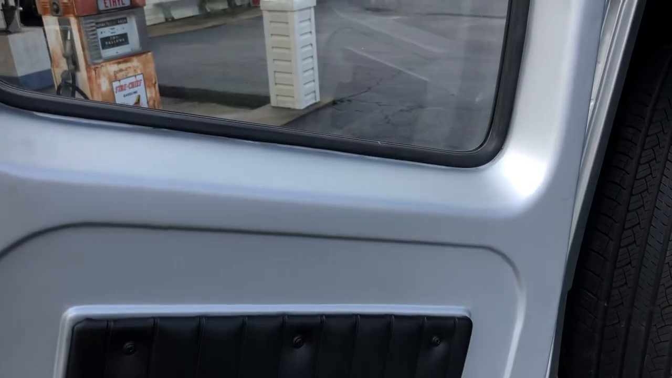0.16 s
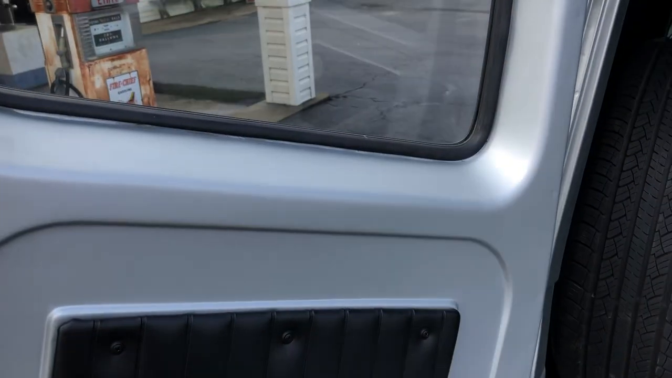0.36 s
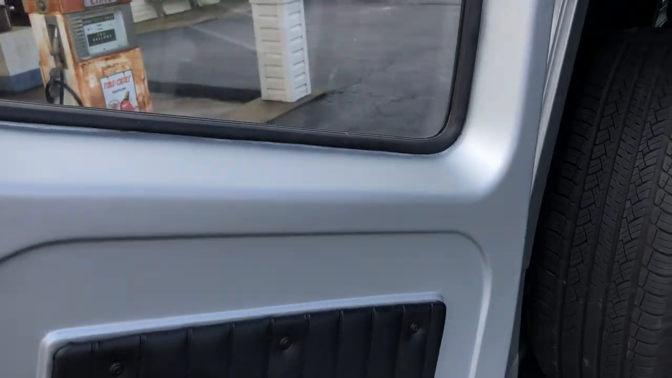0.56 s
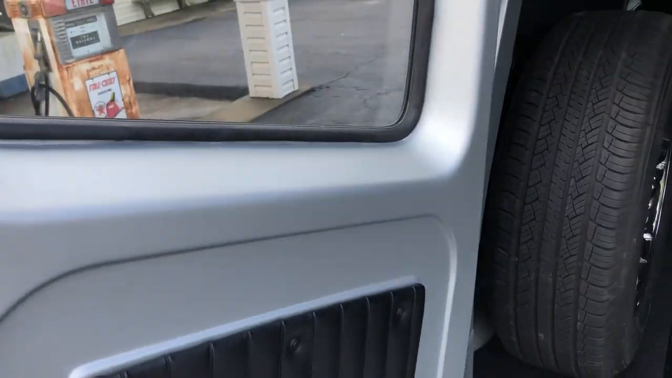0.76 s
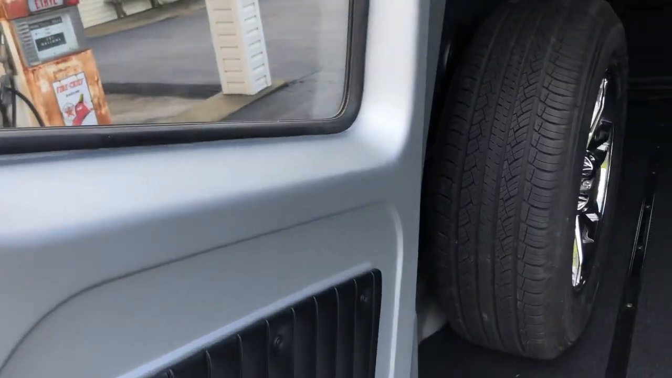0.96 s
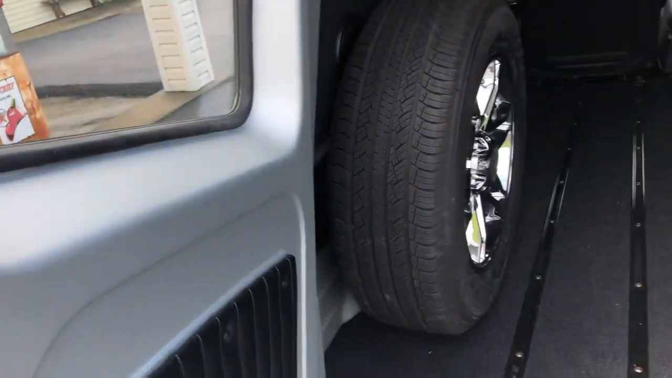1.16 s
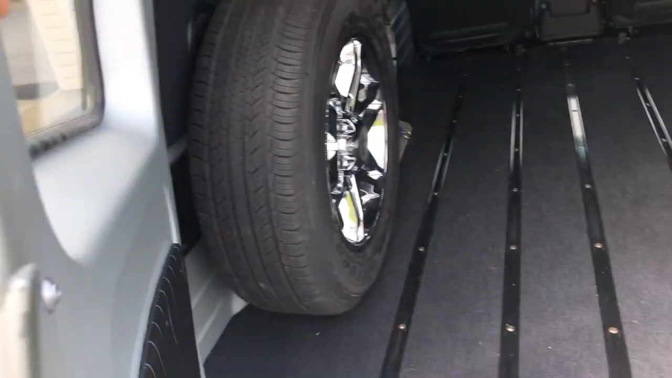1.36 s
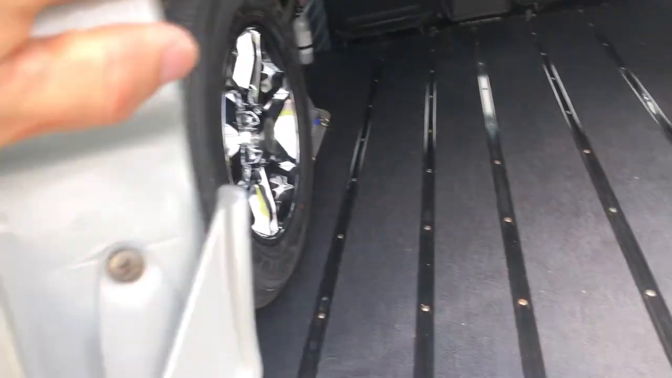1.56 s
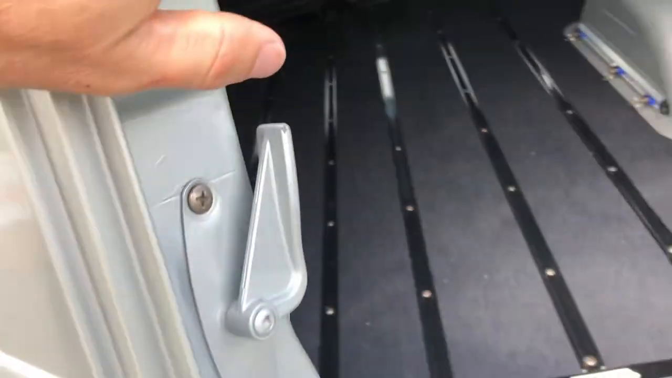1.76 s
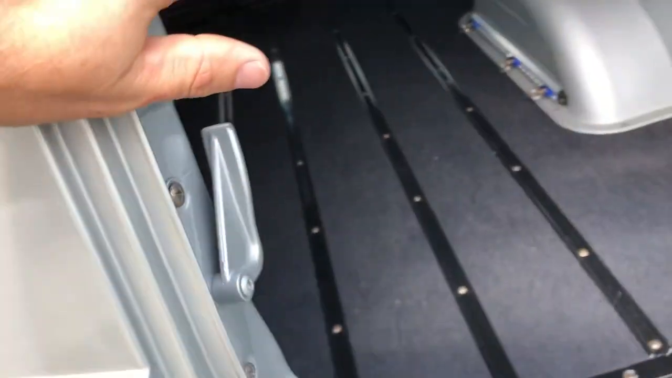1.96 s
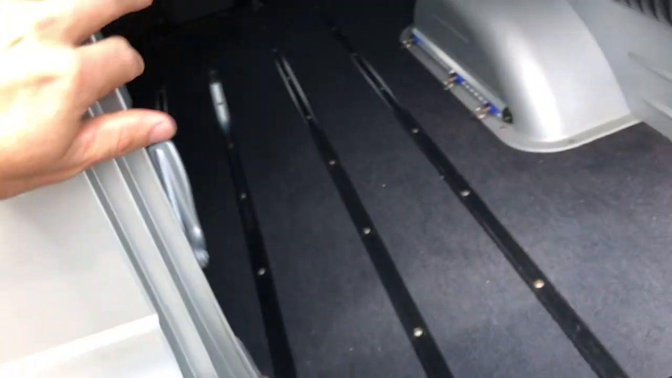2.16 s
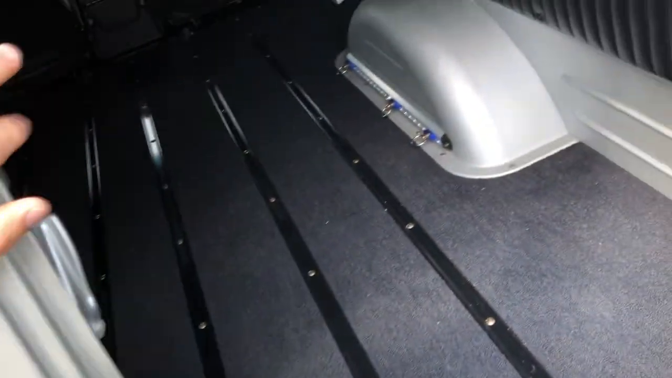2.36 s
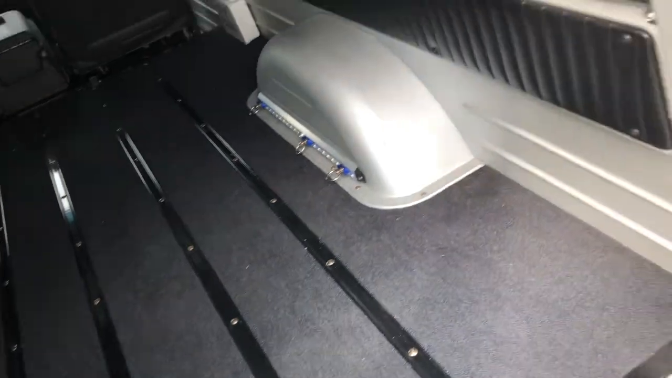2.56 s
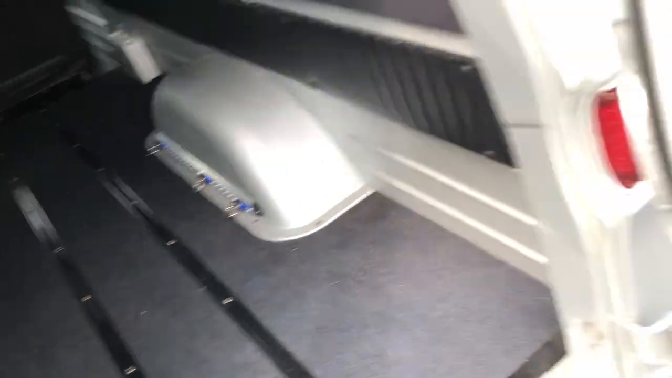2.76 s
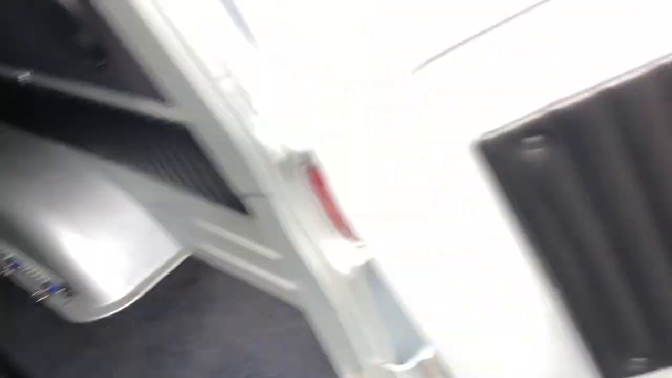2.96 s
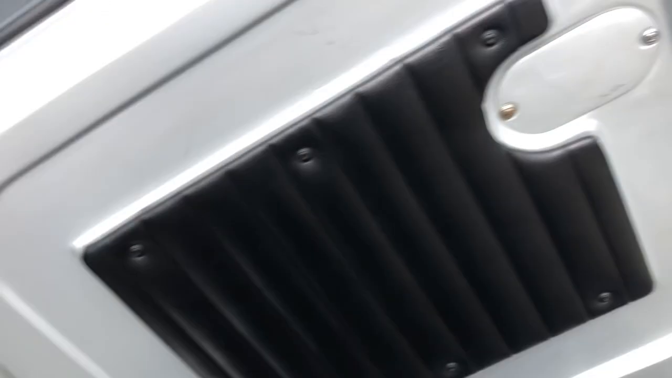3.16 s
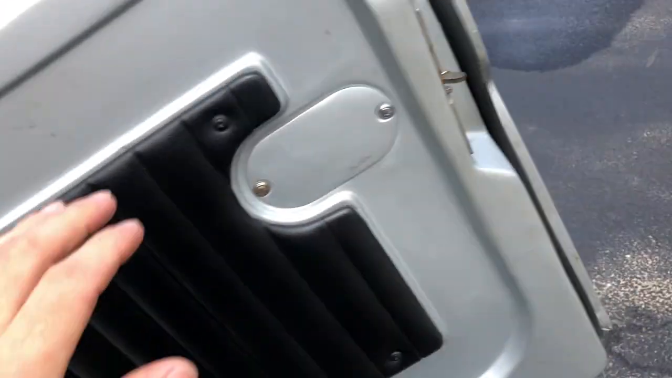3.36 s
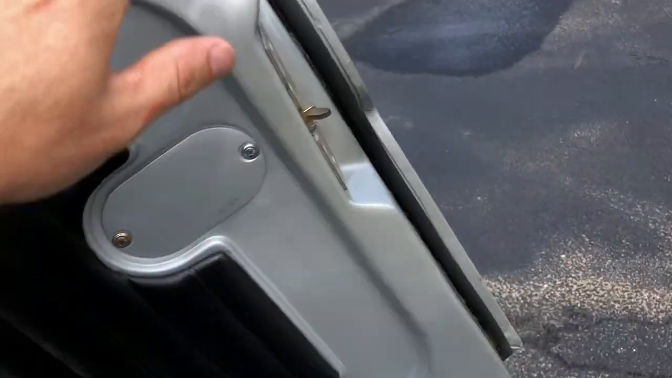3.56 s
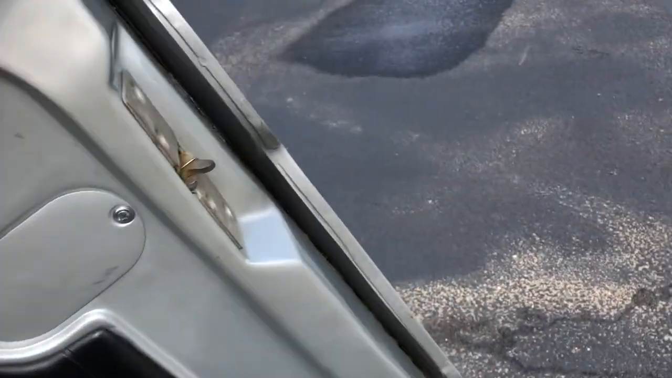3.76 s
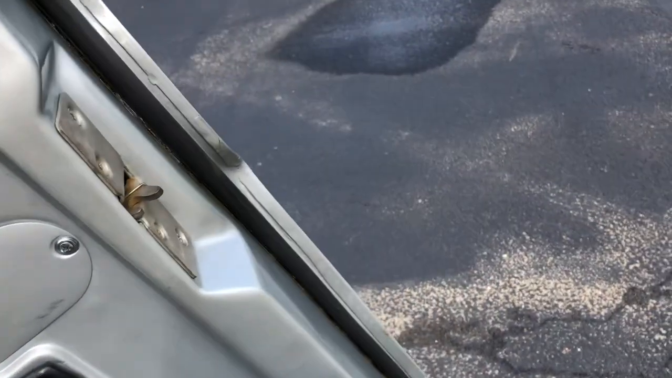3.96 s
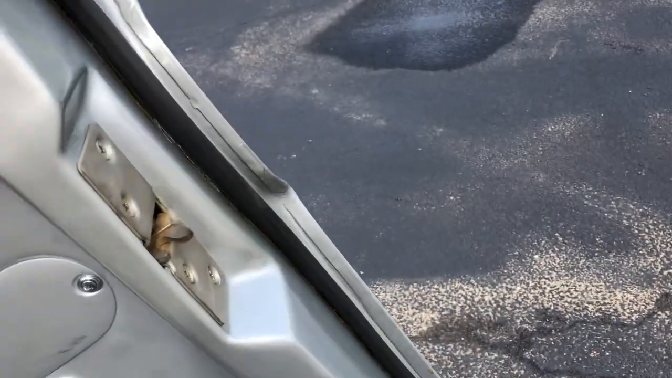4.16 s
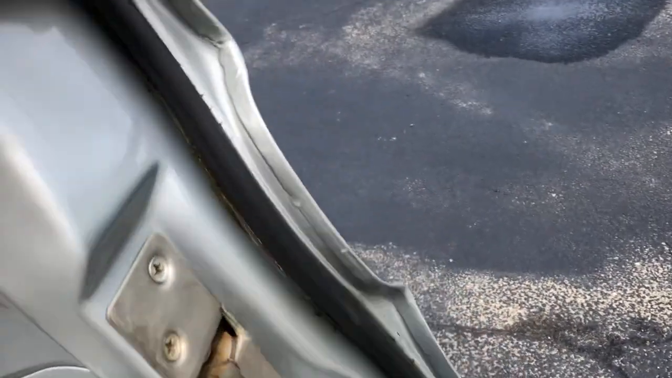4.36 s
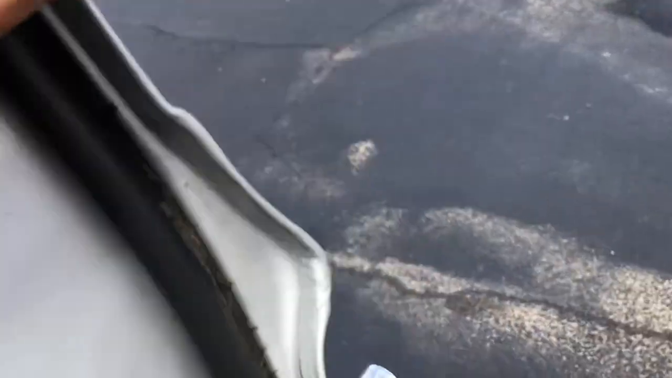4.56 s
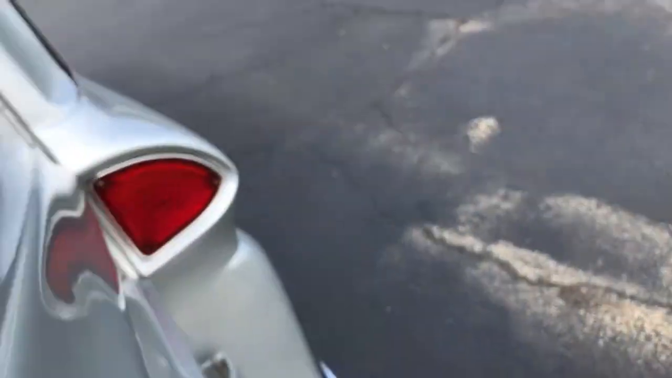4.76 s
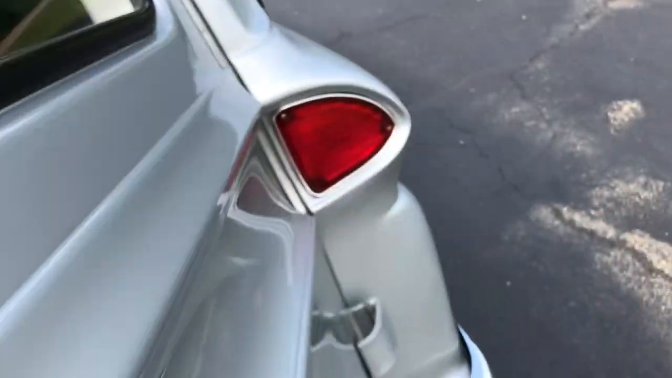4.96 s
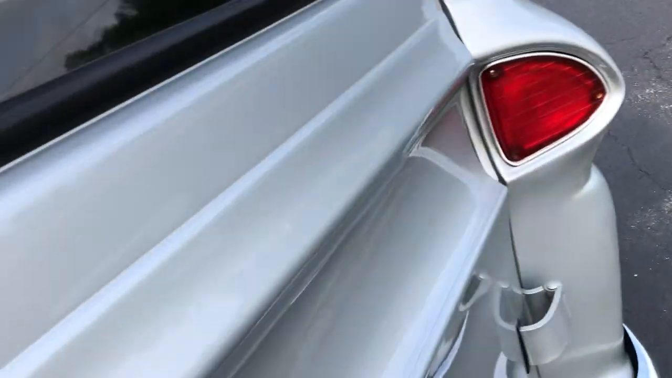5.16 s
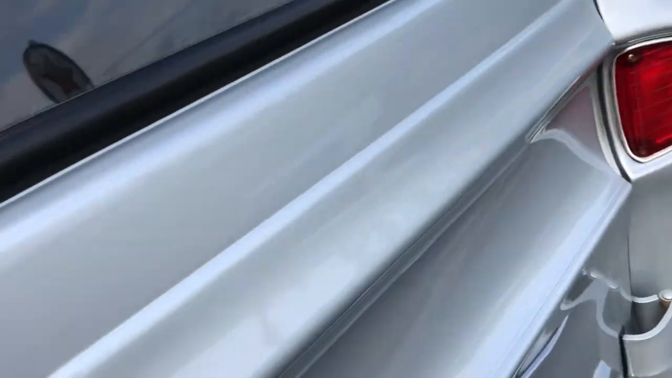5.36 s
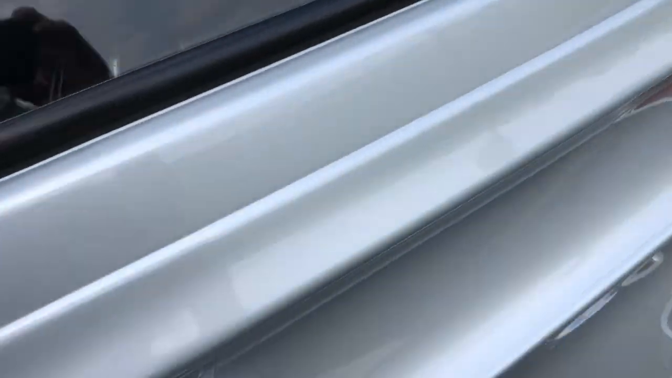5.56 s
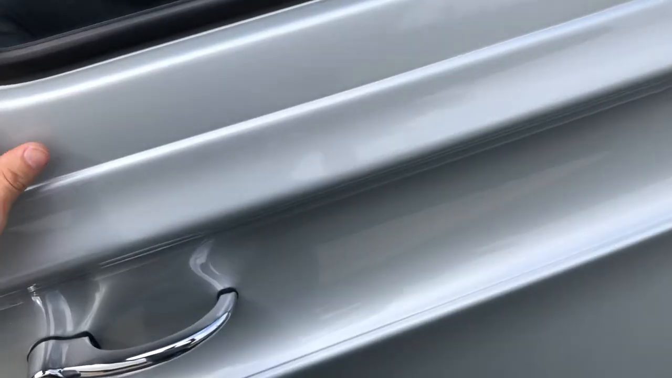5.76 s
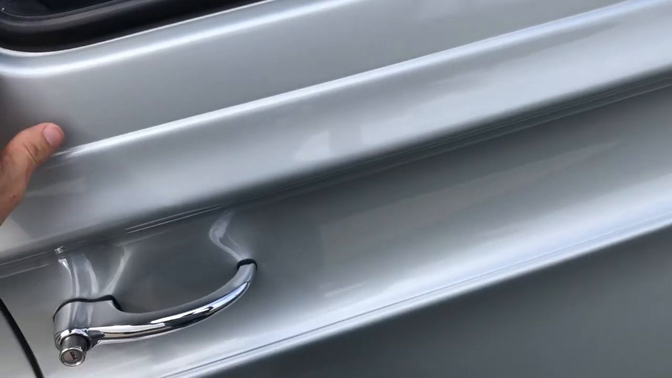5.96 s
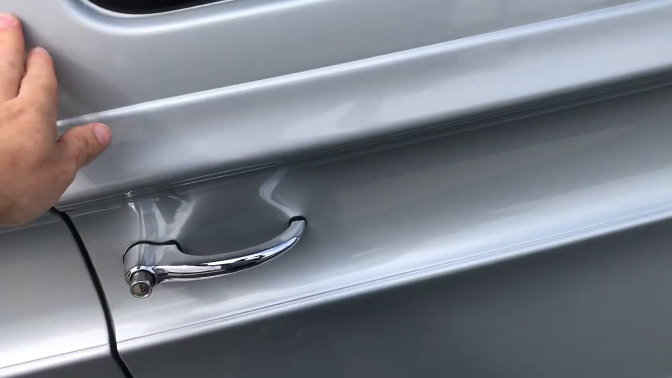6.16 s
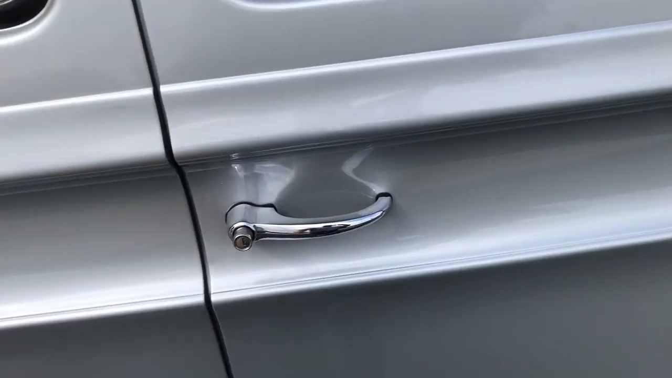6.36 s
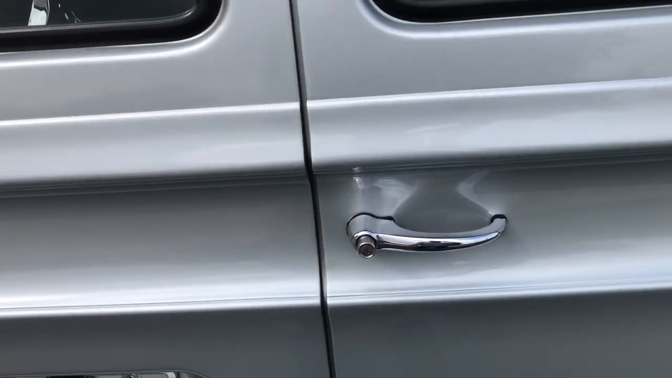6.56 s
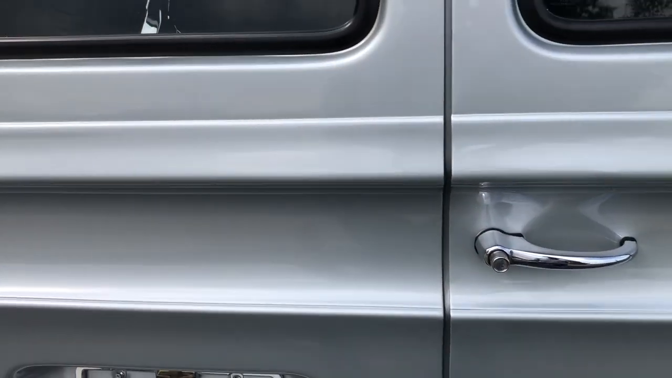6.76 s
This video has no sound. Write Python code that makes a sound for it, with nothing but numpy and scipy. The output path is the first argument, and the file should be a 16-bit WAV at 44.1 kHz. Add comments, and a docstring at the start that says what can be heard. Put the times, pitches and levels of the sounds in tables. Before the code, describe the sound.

Outdoors, close to an old steel van, with faint low traffic rumble and light rustle. From 0.3 to 0.7 s, crisp latch clicks mix with dull door knocks; another small group comes around 1.0 s, and a dry hinge rubs faintly upward in pitch at 1.3-1.55 s. A click at 2.05 s precedes the first slam at 2.2 s: a dense burst of steel blows lasting about 0.2 s, with a deep swelling boom and hollow bay tail. A loose part rattles from 2.5 to 2.9 s. Soft low bumps cluster at 2.95-3.4 s, then faint scuffs, knocks and clicks continue through 5.2 s. A firmer knock and click at 5.6 s lead into the second slam at 5.72 s, sharp, metallic and quickly dulling, with a low ringing boom. Loose taps fade from 5.9 to 6.3 s, leaving one soft knock at 6.5 s and quiet rumble until about 7 s.

```python
"""Van doors slammed on a forecourt

The two steel rear doors of an old van are slammed close by: runs of blows ring dense modes of latch and
sheet steel, and swelling low sines boom with the cargo bay. A loose part then taps for about 0.4 s.
Latch clicks, dull knocks, soft bumps, a dragging hinge, scuffs and tiny ticks are the handling of the
doors, over shaped noise for distant traffic and rustle."""
import sys
import numpy as np
from scipy import signal
from scipy.fft import rfft, irfft
from scipy.io import wavfile

SR = 44100
rng = np.random.default_rng(int(sys.argv[2]) if len(sys.argv) > 2 else 0)


def int16_out(signal):
    """Quantize to a 16-bit WAV file."""
    q = np.round(np.clip(np.atleast_2d(signal).T, -1, 1) * 32767)
    wavfile.write(sys.argv[1], SR, q.astype(np.int16))


N = 304110  # samples
BANDS = np.geomspace(30, 16000, 24)  # band centres, Hz


def amp(db):
    """Amplitude factor of a level in dB."""
    return 10 ** (np.asarray(db) / 20)


def evened(x):
    """The signal scaled to rms 1."""
    return x / np.sqrt(np.mean(x ** 2) + 1e-20)


def read(points, hz=BANDS):
    """Curve through (Hz, value) points, interpolated over log frequency."""
    f, value = np.transpose(points)
    return np.interp(np.log(hz + 1), np.log(f), value)


def add(mix, s, sound):
    """Lay a sound into the mix at s seconds, cut at the end of the mix."""
    part = mix[round(s * SR):][:len(sound)]
    part += sound[:len(part)]


def tilted(colour, slope_db):
    """A harder contact lifts the treble: dB per octave around 3 kHz, level below 500 Hz."""
    return read(colour) + slope_db * np.log2(np.maximum(BANDS, 500) / 3000)


def ringing(rings, q, size):
    """Gain per frequency of a part: a few sharp resonances over a ripple of weaker ones."""
    hz = np.fft.rfftfreq(size, 1 / SR)
    knots_hz = np.cumsum(np.geomspace(25, 130, 250))
    ripple_db = 3 * np.interp(hz, knots_hz, rng.standard_normal(len(knots_hz))) * hz / (hz + 600)
    ripple_db /= np.sqrt(1 + (hz / 8000) ** 2)  # the highest modes overlap and even out
    peaks_db = sum(db / (1 + (q * (hz / f - 1)) ** 2) for f, db in rings)
    return amp(ripple_db + peaks_db)


def dense_modes(size, body=1):
    """Countless modes of random strength and phase, weighted by the body and split into bands."""
    hz = np.fft.rfftfreq(size, 1 / SR)
    band = np.arange(len(BANDS))
    place = np.interp(np.log(hz + 1), np.log(BANDS), band)
    share = np.maximum(1 - abs(place - band[:, None]), 0)  # overlapping triangles
    spectrum = rfft(rng.standard_normal(size)) * body
    spectrum[0] = 0
    return irfft((spectrum * share).astype(np.complex64), size)


def struck(modes, colour_db, t60, cycles):
    """One blow, about rms 1 before its envelopes: each band builds up over some cycles, then decays."""
    t = np.arange(modes.shape[1], dtype=np.float32) / SR
    build = np.float32(BANDS / (cycles + BANDS / 3000))[:, None]
    fade = np.float32(np.log(1000) / t60 * np.ones(len(BANDS)))[:, None]
    shape = (1 - np.exp(-build * t)) * np.exp(-np.minimum(fade * t, 20))
    rings = modes * shape
    power = amp(colour_db) ** 2 * BANDS  # colour is per Hz, bands widen with frequency
    wanted = power / power.sum() * (shape ** 2).sum(1)
    gain = np.sqrt(wanted / ((rings ** 2).sum(1) + 1e-20))
    return np.sqrt(2 / 3) * (gain[:, None] * rings).sum(0)  # 2/3 allows for the overlap of bands


# Blows of latch and door edge in each slam. Each row: start in seconds, steel level in dB before the
# slam's steel trim, frequency in Hz that the contact favours, panel level in dB before the panel trim.
LEFT_BLOWS = [(2.204, -10.5, 3700, -32.5), (2.2215, -9.5, 2300, -19.5), (2.238, -24.5, 1200, -9),
              (2.2505, -14, 3600, -15), (2.2758, -17, 3200, -11.5), (2.297, -18.5, 5300, -14.5),
              (2.314, -36, 900, -15.5), (2.329, -24.5, 6000, -18.5), (2.3366, -17, 6000, -16),
              (2.349, -32, 900, -13.5), (2.377, -23.5, 1600, -19), (2.419, -36, 4000, -25.5)]
RIGHT_BLOWS = [(5.7195, -6, 1900, -24.5), (5.7315, -13, 2100, -6.5), (5.740, -10.5, 1100, -16.5),
               (5.757, -10.5, 3780, -16.5), (5.775, -21.5, 4000, -21.5), (5.787, -15, 1040, -7),
               (5.812, -18.5, 2340, -8.5), (5.832, -23.5, 3000, -26), (5.8713, -25, 2210, -40)]
# Colour of the latch steel, before tilt and contact peak. Each row: frequency in Hz, level in dB per Hz.
LEFT_STEEL = [(150, -23), (500, -4), (1200, -3.5), (2300, 0), (3000, -3), (3800, -5), (6000, -3),
              (8000, -7), (15000, -8)]
RIGHT_STEEL = [(150, -19.5), (500, 6), (1200, -2), (2000, -0.5), (3100, -4.5), (4200, -3), (6300, -4.5),
               (8000, -7.5), (15000, -9.5)]
# Colour of the sheet panels. Each row: frequency in Hz, relative level in dB per Hz.
LEFT_PANEL = [(25, -23.5), (60, -3.5), (100, -2), (200, 1), (380, -5), (550, -9), (750, -17.5),
              (1300, -22.5), (3000, -35), (9000, -58.5)]
RIGHT_PANEL = [(25, -19), (60, 1.5), (85, -2), (120, 7), (300, 6.5), (480, -3), (700, -18), (1000, -30),
               (3000, -35.5), (9000, -68)]
# Resonances that stand out of each door's dense modes. Each row: frequency in Hz, lift in dB.
LEFT_RINGS = [(483, 14.5), (595, 5), (857, 8), (1117, 5), (1536, 2.5), (1728, 2.5), (2258, 3), (2368, 6.5),
              (3166, 4.5), (3675, 7), (4324, 6.5), (6535, 4.5)]
RIGHT_RINGS = [(414, 2.1), (490, 8.9), (716, 3.7), (978, 8), (1371, 5.5), (1630, 6), (1791, 4.7),
               (2220, 6.8), (2736, 4.6), (3830, 9.6), (4370, 6.75), (6250, 8.9)]
# Decay of the steel, before each door's ring factor. Each row: frequency in Hz, t60 in seconds.
STEEL_T60 = [(400, .16), (2000, .11), (6000, 0.08), (15000, 0.092)]
# Decay of the panels. Each row: frequency in Hz, t60 in seconds.
PANEL_T60 = [(60, 0.37), (200, 0.17), (600, .22), (3000, 0.58)]


def slam(blows, steel_colour, panel_colour, rings, steel_db, panel_db, ring,
         first_bright_db, dulling_db_per_s, contact_db):
    """Each blow rings latch steel and sheet panels together; the steel gets duller from blow to blow."""
    out = np.zeros(N)
    door = ringing(rings, q=61, size=12288)
    latch = dense_modes(size=12288, body=door)
    for s, hit_db, contact_hz, body_db in blows:
        # partly the same modes at every contact
        steel = 0.5 * latch + 0.49 * dense_modes(size=12288, body=door)
        bright_db = first_bright_db - dulling_db_per_s * (s - blows[0][0])
        contact_peak_db = contact_db * np.exp(-(np.log2(BANDS / contact_hz) / 0.35) ** 2)
        colour_db = tilted(steel_colour, bright_db) + contact_peak_db
        crack = struck(steel, colour_db, ring * read(STEEL_T60), cycles=0.43)
        add(out, s, amp(hit_db + steel_db) * crack)
        panel = dense_modes(size=12288, body=door)
        thump = struck(panel, read(panel_colour), read(PANEL_T60), cycles=0.46)
        add(out, s, amp(body_db + panel_db) * thump)
    return out


# Each door meeting its seal: start in seconds, time in seconds for the boom to swell.
LEFT_SEAL = (2.212, 0.089)
RIGHT_SEAL = (5.722, 0.09)
# Low modes of door and cargo bay. Each row: frequency in Hz, level in dB, t60 in seconds.
LEFT_MODES = [(62.5, -12, 0.4), (99.2, -20, 0.27), (144, -24.5, 0.27), (194.2, -23, 0.54),
              (222.3, -17.5, 0.62), (345, -29.5, 1), (387, -29, 0.3), (471.7, -23.5, 0.66),
              (544, -34.5, 0.39), (580, -32.5, 0.18)]
RIGHT_MODES = [(61, -24, 0.36), (118.9, -18, 0.5), (143.2, -20.5, 1.17), (173.2, -16.5, 0.73),
               (184.6, -24.5, 1.5), (193.8, -32.5, 2.33), (313, -26.5, 1.04), (451, -32, 0.91)]


def boom(seal, modes):
    """The door squeezes its seal; the low modes of door and cargo bay swell and ring out."""
    s, swell = seal
    out, t = np.zeros(N), np.arange(SR * 3 // 2) / SR
    push = np.sin(np.pi / 2 * np.minimum(t / swell, 1)) ** 2
    for hz, db, t60 in modes:
        fade = np.exp(-np.log(1000) * np.maximum(t - swell, 0) / t60)
        add(out, s, np.sqrt(2) * amp(db) * push * fade * np.sin(2 * np.pi * hz * t))
    return out


# Decay of the bare bay. Each row: frequency in Hz, t60 in seconds.
BAY_T60 = [(100, 0.65), (500, .65), (2000, 0.41), (6000, .45), (15000, 0.21)]


def cargo_bay(x, wet_db):
    """The bare steel bay behind the doors returns a diffuse tail."""
    colour_db = read([(100, -2.0), (2000, -3.0), (6000, -7), (15000, 1)])
    tail = struck(dense_modes(size=32768), colour_db, read(BAY_T60), cycles=4.3)
    tail *= 1 - np.exp(-np.arange(len(tail)) / SR / 0.013)  # the echoes gather over 13 ms
    return x + amp(wet_db) * signal.oaconvolve(x, tail / np.linalg.norm(tail))[:N]


# Rattle after each slam. Each row: start in seconds, last drop in seconds, first swing in seconds,
# level in dB before the rattle's trim, fade in dB per second, brightness in dB per octave, its change
# per second, lean in dB towards the stop hit first, its change in dB per second.
RATTLES = [(2.523, 2.883, .0345, -37, 2, -1, 10.5, 3, -18.5),
           (5.909, 6.311, .0350, -37, 28, 1, -3.5, 2.5, 4)]
# Each swing outlasts the one before. Each entry: growth in seconds, left door then right.
SWING_GROWTH_S = [.0005, .00016]
# Colour of the loose part, before tilt and scatter. Each row: frequency in Hz, level in dB per Hz.
LOOSE_PART = [(100, 7.5), (400, 6), (900, 2.5), (1450, 0.5), (2200, -2.5), (4000, -11), (5800, -6.5),
              (8500, -10), (11000, -16.5), (15000, -11.5)]
# Resonances of the loose part. Each row: frequency in Hz, lift in dB.
LOOSE_RINGS = [(695, 3.3), (1172, 7), (1420, 10.5), (2107, 2), (2621, 3.7), (5279, 4.4), (6596, 5),
               (8723, 5.6), (10683, 4.7)]


def rattle(row, growth_s, level_db, t60, drop_db):
    """A loose part taps two stops in ever slower swings, pauses for most of a swing and drops to rest."""
    start, rest, swing_s, db, fade_db, bright_db, brighten_db, lean_db, lean_change_db = row
    out, body = np.zeros(N), ringing(LOOSE_RINGS, q=13, size=6144)
    part = dense_modes(size=6144, body=body)
    k = np.arange(24)  # two taps a swing
    age = swing_s * k / 2 + growth_s * (k / 2) ** 2 / 2
    side_db = (-1) ** k * (lean_db + lean_change_db * age)
    tap_db = db - fade_db * age + side_db + 0.92 * rng.standard_normal(len(k))
    times = start + age + .0007 * rng.standard_normal(len(k))
    taps = [(rest, db - fade_db * (rest - start) + drop_db)]
    taps += [tap for tap in zip(times, tap_db) if tap[0] < rest - .85 * swing_s]
    for s, hit_db in taps:
        # each landing favours other modes
        landing = ringing([(hz, 9) for hz in rng.uniform(1120, 11780, size=7)], q=30, size=6144)
        modes = 0.55 * part + 0.7 * dense_modes(size=6144, body=body * landing)
        colour_db = tilted(LOOSE_PART, bright_db + brighten_db * (s - start))
        colour_db = colour_db + 2.7 * rng.standard_normal(len(BANDS))
        tap = struck(modes, colour_db, t60 * (BANDS / 3000) ** -.35, cycles=2.6)
        tap = amp(hit_db + level_db) * tap
        add(out, s, tap)
        add(out, s + rng.uniform(.002, .007), 0.39 * tap)  # a weaker repeat follows at once
    return out


# Clicks of latch and hinges. Each row: start in seconds, level of the ring in dB before its first
# crack is added, brightness in dB per octave.
CLICKS = [(0.343, -33.5, -4), (.352, -38, 2), (0.365, -29, -1.5), (0.3777, -26, 0.5), (.427, -49, -5),
          (.558, -53, -7.5), (0.6, -33, -1.5), (.626, -47, -8.5), (0.7031, -34, -2), (.980, -33.5, -3.5),
          (.997, -36.5, -4.5), (1.015, -39.5, -6.5), (1.093, -38, -5.5), (1.267, -48, -1.5),
          (1.699, -47.5, -4.5), (2.039, -43.5, -2), (2.055, -29.5, 0), (2.182, -44, -2), (3.314, -58, 1),
          (3.622, -43.5, -7.5), (4.012, -44.5, -7), (4.031, -38.5, -7), (4.274, -35.5, 2),
          (4.872, -41, -1.5), (5.5883, -33, -6)]
# Colour of the latch parts, before tilt. Each row: frequency in Hz, level in dB per Hz.
LATCH = [(100, -15.5), (400, -6), (950, -0.5), (1400, 0), (2600, -1.5), (3600, 0), (5000, -3), (6500, -4.5),
         (9000, -5), (15000, -18)]
# Resonances of the latch parts. Each row: frequency in Hz, lift in dB.
LATCH_RINGS = [(797, 7.1), (936, 12), (1140, 1.8), (1804, 7), (2839, 2.2), (3113, 3.1), (3943, 5.5),
               (6090, 1.4), (6436, 2.3)]
# t60 of a neutral click at 3 kHz in seconds, and the brightness in dB per octave that halves it
CLICK_T60_S, CLICK_HALVING_DB = 0.061, 7.5


def clicks():
    """Small steel parts snap together; brighter contacts have a sharper first crack and a shorter ring."""
    out, body = np.zeros(N), ringing(LATCH_RINGS, q=42, size=6144)
    t = np.arange(6144) / SR
    for s, db, bright_db in CLICKS:
        t60 = CLICK_T60_S * 2 ** (-bright_db / CLICK_HALVING_DB) * (BANDS / 3000) ** -.3
        ring = struck(dense_modes(size=6144, body=body), tilted(LATCH, bright_db), t60, cycles=1.0)
        crack = 0.79 * amp(2 * bright_db) * np.exp(-t / 0.00093)
        add(out, s, amp(db) * ring * (1.0 + crack))
    return out


def thuds(rows, colour, t60_of, cycles, body=1):
    """Soft contacts last too long to excite much above their corner."""
    out = np.zeros(N)
    for s, db, corner_hz in rows:
        dull_db = read(colour) - 10 * np.log10(1 + (BANDS / corner_hz) ** 10)
        thud = struck(dense_modes(size=10240, body=body), dull_db, t60_of(corner_hz), cycles)
        add(out, s, amp(db) * thud)
    return out


# Dull knocks on the swinging doors. Each row: start in seconds, level in dB, corner in Hz.
KNOCKS = [(.350, -36, 500), (.383, -29, 520), (.430, -36, 560), (.668, -32, 300), (.985, -38, 1000),
          (1.010, -30.5, 286), (1.095, -42, 1200), (1.218, -32, 318), (1.505, -33.5, 294),
          (2.050, -40.5, 703), (3.945, -38.5, 298), (4.029, -28.5, 1000), (4.345, -33, 305),
          (4.654, -39, 494), (4.835, -41, 814), (5.23, -36, 513), (5.586, -24, 800), (5.634, -32.5, 610),
          (5.69, -28.5, 248), (6.522, -35.5, 326)]
# Colour of the knocks below their corner. Each row: frequency in Hz, level in dB per Hz.
KNOCK = [(30, -25.5), (70, -12), (130, 3.5), (220, -2.5), (400, -0.5), (700, -7.5), (1000, -4), (3000, -12)]
# Resonances of the knocked panel. Each row: frequency in Hz, lift in dB.
KNOCK_RINGS = [(279, 9.5), (365, 6), (503, 2), (641, 6.8), (870, 5.2), (978, 6.1)]
KNOCK_T60_S, KNOCK_HZ = .19, 604  # t60 of a knock whose corner is at KNOCK_HZ


def knocks():
    """Knocks ring the door panel; a harder one has a higher corner and rings for longer."""
    panel = ringing(KNOCK_RINGS, q=23, size=10240)
    return thuds(KNOCKS, KNOCK, lambda hz: KNOCK_T60_S * (hz / KNOCK_HZ) ** 0.64, cycles=0.96, body=panel)


# Soft bumps of handling while walking round the door. Each row: start in seconds, level in dB,
# corner in Hz.
BUMPS = [(1.02, -31, 90), (1.725, -32.5, 131), (2.968, -26, 250), (2.994, -29, 400), (3.042, -25.5, 361),
         (3.084, -25.5, 282), (3.130, -23.5, 203), (3.170, -27, 149), (3.228, -27.5, 171),
         (3.345, -33, 252), (3.412, -30, 276)]
# Colour of the bumps below their corner. Each row: frequency in Hz, level in dB per Hz.
BUMP = [(25, -23), (55, 3.5), (100, -2), (160, -1.5), (300, -8.5), (1000, -1.5)]


def bumps():
    """Soft low bumps, all dying at the same speed, without any panel resonance."""
    return thuds(BUMPS, BUMP, lambda hz: 0.11, cycles=0.29)  # t60 in s


# Hinge dragging as the door starts to swing: start in seconds, length in seconds, level in dB before
# attack and fade.
HINGE = (1.308, 0.26, -51)
# Resonances of the hinge, before their rise. Each row: frequency in Hz, relative level in dB.
HINGE_RINGS = [(930, 13.5), (1320, 12.5), (1700, 14.5), (1880, 8.5), (2280, 7), (3050, 3.5), (3480, 2.5)]
HINGE_ATTACK_S, HINGE_HOLD_S, HINGE_FADE_DB_PER_S = 0.029, 0.14, 72  # the hold ends at HINGE_HOLD_S
HINGE_RISE_PER_S = .45  # the resonances climb by this share as the door turns


def hinge():
    """Tiny irregular slips of the dry hinge ring its rising resonances: a quick start, a hold, a fade."""
    start, length, db = HINGE
    t = np.arange(0, length, 1 / SR)
    slips = (rng.standard_normal(N) * (rng.random(N) < 1500 / SR))[:2 * len(t)]  # 1500 per s
    rub = 0
    for hz, ring_db in HINGE_RINGS:
        b, a = signal.iirpeak(hz, 11, SR)
        ring = signal.lfilter(b, a, signal.lfilter(b, a, slips))
        rub = rub + amp(ring_db) * evened(ring)
    place = np.cumsum(1 + HINGE_RISE_PER_S * (t - length / 3))  # played ever faster
    rub = np.interp(place, np.arange(len(rub)), rub)
    attack = np.minimum(t / HINGE_ATTACK_S, 1)
    fade_db = HINGE_FADE_DB_PER_S * np.maximum(t - HINGE_HOLD_S, 0)
    out = np.zeros(N)
    add(out, start, evened(rub) * attack * amp(db - fade_db))
    return out


# Scuffs of hand and shoes. Each row: start in seconds, length in seconds, level in dB before the
# swell and fade, centre in Hz.
SCUFFS = [(1.754, 0.14, -60.5, 790), (1.9, 0.09, -62.5, 1960), (3.629, 0.11, -57.5, 2360),
          (3.718, 0.11, -65, 4200), (3.914, .095, -62.5, 2680), (4.2, 0.091, -65, 2790),
          (4.469, 0.083, -56.5, 3050), (4.747, 0.064, -58.5, 2540), (5.16, 0.13, -56.5, 1464)]


def scuffs():
    """Grainy friction in one broad resonance, swelling and fading with the stroke."""
    out = np.zeros(N)
    for s, length, db, hz in SCUFFS:
        grains = rng.standard_normal(SR) * amp(8.4 * rng.standard_normal(SR))
        b, a = signal.iirpeak(hz, 3, SR)
        rub = signal.lfilter(b, a, grains[:int(length * SR)])
        add(out, s, amp(db) * evened(rub) * signal.windows.tukey(len(rub), .6))
    return out


# Midrange wash of far traffic and nearby rustle, which the ticks follow and the street plays.
# Each row: time in seconds, level in dB around which it wavers.
WASH = [(0, -65.5), (.45, -54), (1.0, -52.5), (1.25, -57), (1.8, -56), (2.9, -59.5), (3.55, -65),
        (3.95, -60), (4.25, -54.5), (4.7, -55), (5.28, -51), (5.5, -56), (6.45, -62.5), (6.9, -61)]
WASH_DB = -55  # wash level at which ticks and hiss have their nominal level


def fidgets(per_s, level_db, spread_db):
    """Tiny random ticks of hand and clothes, heard mostly while the wash is strong."""
    t = np.arange(N) / SR
    out = np.zeros(N)
    for bright_db in np.linspace(-9, -2, num=4):
        ticks = (rng.random(N) < per_s / 4 / SR) * amp(spread_db * rng.uniform(-1, 1, N))
        ring = struck(dense_modes(size=4096), tilted(LATCH, bright_db), .07, cycles=1.5)
        out += signal.oaconvolve(ticks, ring)[:N]
    return out * amp(level_db + np.interp(t, *np.transpose(WASH)) - WASH_DB)


def drift(per_s):
    """Slow random wandering of rms 1, with per_s knots a second."""
    knots = rng.standard_normal(int(per_s * N / SR) + 2)
    return evened(np.interp(np.arange(N) * per_s / SR, np.arange(len(knots)), knots))


# Low rumble. Each row: time in seconds, level in dB around which it wavers.
RUMBLE = [(0, -53), (.7, -47), (1.5, -50.5), (1.9, -56.5), (2.9, -42), (3.25, -43), (3.6, -55),
          (4.3, -47.5), (4.7, -53), (5.5, -50.5), (6.4, -46.5), (6.9, -47.5)]
# Colour of the street, before the split into three layers. Each row: frequency in Hz, level in dB per Hz.
STREET = [(20, -28), (48, -0.5), (110, 3), (190, -0.5), (300, -7), (420, -15), (960, -16.5), (1500, -24.5),
          (2500, -30.5), (8200, -40), (8900, -35), (9800, -42), (15000, -43)]
# hiss level in dB when the wash is at WASH_DB, and the share of each swell of the wash that it takes
HISS_DB, HISS_SHARE = -67, 0.3


def street():
    """Lumpy low rumble, a midrange wash and a thin hiss that swells with it, all of shaped noise."""
    hz, t = np.fft.rfftfreq(N, 1 / SR), np.arange(N) / SR
    rumble_db = np.interp(t, *np.transpose(RUMBLE))
    wash_db = np.interp(t, *np.transpose(WASH))
    hiss_db = HISS_DB + HISS_SHARE * (wash_db - WASH_DB) + 0.97 * drift(per_s=4.7)
    low = 1 / (1 + (hz / 330) ** 6)
    high = 1 - 1 / (1 + (hz / 1700) ** 6)
    colour = amp(read(STREET, hz)) * (hz > 15)

    def layer(share, db):
        """Noise in one share of the street's power, at a moving level."""
        spectrum = rfft(rng.standard_normal(N)) * colour * np.sqrt(abs(share))
        return evened(irfft(spectrum, N)) * amp(db)

    rumble = layer(low, rumble_db) * amp(1.5 * drift(per_s=12))
    wash = layer(1 - low - high, wash_db) * amp(0.78 * drift(per_s=32))
    hiss = layer(high, hiss_db) * amp(1.6 * drift(per_s=38))
    return rumble + wash + hiss


def scene():
    """Two slams with their boom and rattle, the handling of the doors, and the street."""
    left = slam(LEFT_BLOWS, LEFT_STEEL, LEFT_PANEL, LEFT_RINGS, steel_db=1.0, panel_db=2.0, ring=1.05,
                first_bright_db=1.0, dulling_db_per_s=3, contact_db=5)
    right = slam(RIGHT_BLOWS, RIGHT_STEEL, RIGHT_PANEL, RIGHT_RINGS, steel_db=-0.5, panel_db=2.0, ring=0.74,
                 first_bright_db=-0.35, dulling_db_per_s=14.5, contact_db=7.0)
    doors = cargo_bay(left, wet_db=-10.5) + cargo_bay(right, wet_db=-13.5)
    booms = boom(LEFT_SEAL, LEFT_MODES) + boom(RIGHT_SEAL, RIGHT_MODES)
    rattles = sum(rattle(row, growth_s, level_db=2.5, t60=0.11, drop_db=-3)
                  for row, growth_s in zip(RATTLES, SWING_GROWTH_S))
    handling = cargo_bay(clicks(), wet_db=-15.5) + knocks() + bumps() + hinge() + scuffs()
    handling += fidgets(per_s=14, level_db=-57, spread_db=4)
    return (doors + booms + rattles + handling + street())[None]


def record(dry):
    """The loudest peaks are rounded off below a ceiling; then a low-pass limits the band."""
    ceiling, edge_hz = .9, 16100
    rounded = dry / (1 + (dry / ceiling) ** 6) ** (1 / 6)
    low_pass = signal.firwin(301, edge_hz, window=("kaiser", 9), fs=SR)
    return signal.oaconvolve(rounded, low_pass[None], "same")


dry = scene()
out = record(dry)
int16_out(out)
```